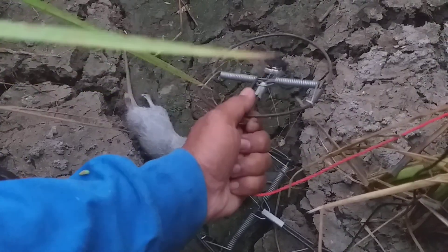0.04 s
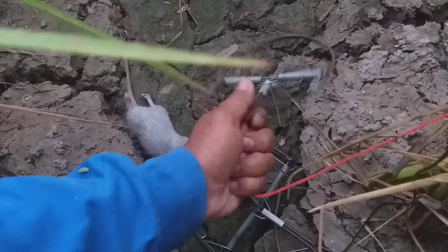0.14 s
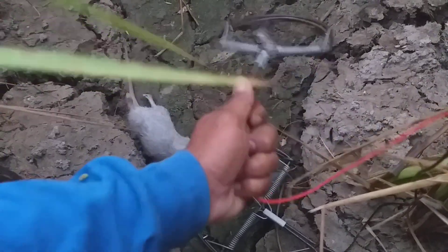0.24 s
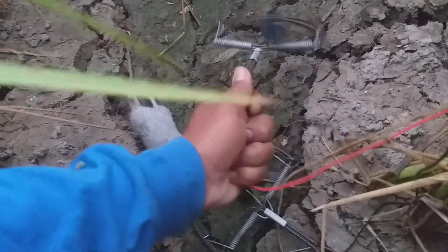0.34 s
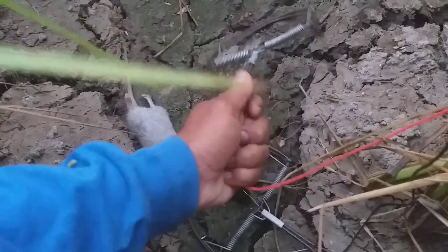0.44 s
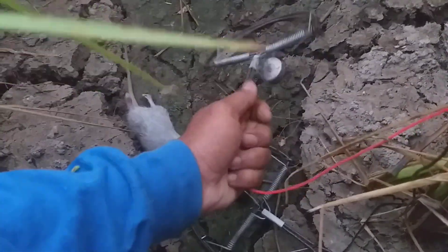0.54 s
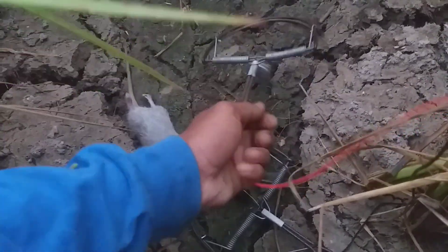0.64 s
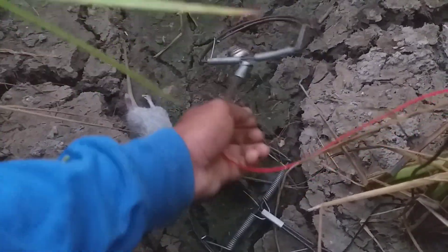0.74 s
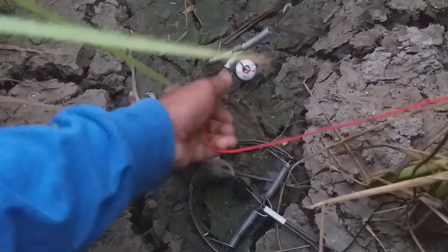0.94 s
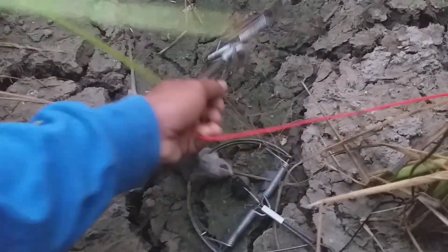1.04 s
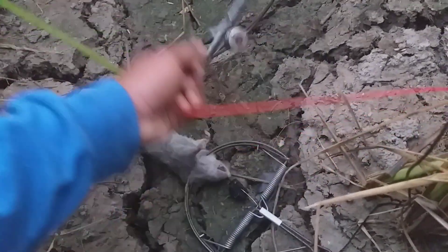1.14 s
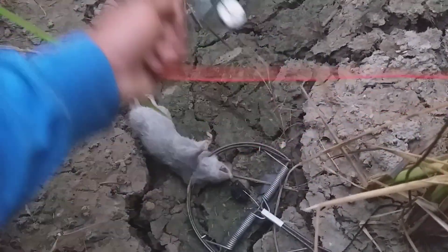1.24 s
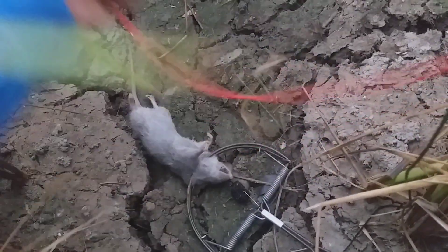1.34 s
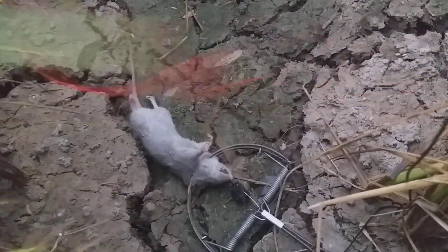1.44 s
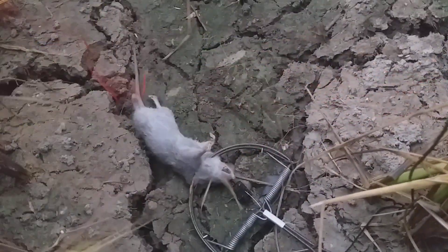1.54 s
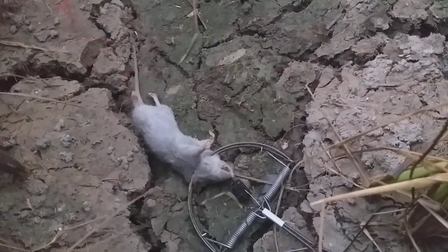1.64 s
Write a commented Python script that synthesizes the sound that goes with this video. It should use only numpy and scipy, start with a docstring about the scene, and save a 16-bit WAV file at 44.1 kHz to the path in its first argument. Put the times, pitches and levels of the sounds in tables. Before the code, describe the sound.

A steel spring trap snaps shut on dry mud, then ticks and dry grass rustles.

```python
"""A steel spring trap on dry mud, close to a small phone microphone, over far rumble and a faint bird.
A few light ticks, then at 0.2 s the springs let go: the bar snaps shut in a burst of blows, and the
frame rings and thuds into the mud. The springs shudder out; wire and plate tick as the trap settles.
From about 1 s it is pulled away through dry grass, and stalks crack. The microphone's bright peak near
7.6 kHz and its dip above that are part of the spectra of snap, ticks and grass."""
import sys
import numpy as np
from scipy import signal
from scipy.fft import rfft, irfft
from scipy.io import wavfile

SR = 44100
rng = np.random.default_rng(int(sys.argv[2]) if len(sys.argv) > 2 else 0)


def store_pcm(level_fs):
    """Save levels as 16-bit WAV."""
    pcm = np.round(np.clip(level_fs, -1, 1) * 32767).astype(np.int16)
    wavfile.write(sys.argv[1], SR, np.atleast_2d(pcm).T)


N = 72765


def snap():
    """The bar lands in hard blows, each a crack and a spray; the springs chatter, the frame hits mud."""
    # blows of the bar: t/s, relative level/dB
    blows = [(0.2139, -9.5), (.2150, -1.5), (.2160, -2), (0.2177, -5.5), (.2190, -11), (0.2203, -5),
             (0.2224, -10), (0.2259, -9.5), (0.2332, -19.5), (.2412, -18)]
    # slip, release and dying shudder of the springs: t/s, relative level/dB
    shudder = [(.170, -96), (.178, -61.5), (.2025, -53), (.205, -24.5), (.2135, -34), (.2160, -24.5),
               (.225, -27), (.234, -29), (.245, -33), (.268, -41.5), (.278, -42.5), (.31, -53.5),
               (.335, -51.5), (.37, -58), (.40, -58), (.43, -75)]
    # spectrum of the snap at the microphone: f/Hz, relative level/dB
    spectrum = [(88, -40), (150, -15), (466, -16.5), (566, -20.5), (905, -18.5), (1530, -29), (1870, -22),
                (3160, -10.5), (3420, -15.5), (4410, -7.5), (5570, -17.5), (7770, -4.5), (9820, -22.5),
                (14800, -9), (16000, -8)]
    shelf_hz = 1400   # spray and chatter are weaker below this
    spray = sum(fade(s, db - 9.5, t60=0.014) for s, db in blows) * grains(per_s=12000, spread_db=1.5)
    spray = split(spray, amp(-3) * spray, shelf_hz)
    cracks = sum(hit(s, db + 5) for s, db in blows)
    chatter = amp(curve(shudder, outside=-200) + 3.1 * drift(hz=190)) * grains(per_s=3500, spread_db=2.5)
    chatter = split(chatter, amp(-7) * chatter, shelf_hz)
    contacts = spray + cracks + chatter
    push = fade(blows[0][0], db=-18, t60=0.0091)   # the first blow drives the frame into the mud
    thud = ring(signal.lfilter([1, -1], [1], push), hz=112.7, t60=0.036)
    return colour(contacts, spectrum) + steel_frame(contacts) + thud


def steel_frame(contacts):
    """Every contact sets the frame's modes ringing."""
    # modes of the frame: f/Hz, relative level/dB, t60/s
    modes = [(3100, -13, .08), (3230, -48, .9), (4000, -20, .1), (4310, -16, .06), (7430, -17, .17),
             (7570, -16, .13), (7770, -6, .1), (7930, -4, .065), (8320, -12, .06), (11390, -27, .1),
             (13290, -19, .1), (14420, -17, .05), (14860, -8, .045), (15150, -18, .06)]
    return amp(-31) * sum(amp(db) * ring(contacts, hz, t60) for hz, db, t60 in modes)


def ticks():
    """Wire and plate knock before the snap and as the trap settles, ringing the frame's middle modes."""
    # small knocks: t/s, bright level/dB, t60/s, body f/Hz, body level/dB (levels relative)
    taps = [(.066, -52, 0.011, 5000, -83), (0.119, -51, 0.0082, 5060, -83), (.136, -66, 0.033, 3120, -63),
            (.190, -48, .02, 4540, -57), (0.2019, -29, 0.018, 3200, -24), (.206, -68, 0.015, 1100, -29.5),
            (.2455, -39, 0.0078, 4450, -27), (.249, -55, 0.017, 4250, -26.5),
            (.2595, -24, 0.015, 3900, -23), (0.2807, -29, 0.018, 5800, -33.5),
            (0.293, -51, 0.027, 3980, -58), (.316, -38, .025, 2200, -44), (.3175, -40, 0.017, 3260, -40.5),
            (.3185, -37.5, 0.02, 4450, -38), (0.344, -40, .05, 4120, -54), (.349, -38, 0.066, 4030, -50),
            (.364, -46, 0.042, 3320, -47), (.381, -42.5, 0.047, 3530, -64), (0.391, -37, 0.035, 885, -60.5),
            (0.395, -39.5, .04, 3040, -72), (.412, -49, 0.033, 3900, -55),
            (0.433, -52.5, 0.0051, 5030, -71), (.4415, -52, 0.013, 5500, -62),
            (0.4418, -39.5, 0.038, 5800, -73), (.473, -39.5, 0.023, 4400, -52),
            (.4848, -34.5, 0.029, 4500, -52), (.5245, -56, .04, 4550, -60), (.573, -43.5, 0.06, 4300, -53),
            (0.5866, -42.5, 0.018, 5300, -50), (.590, -33.5, 0.021, 2300, -62.5),
            (.678, -29, 0.0062, 4570, -49.5), (0.782, -75, 0.026, 3370, -69), (.785, -73, 0.029, 4500, -65)]
    # spectrum of their bright part at the microphone: f/Hz, relative level/dB
    spectrum = [(2940, -51), (5000, -16), (6050, -20.5), (6660, -7), (7530, 3.5), (8580, -8.5),
                (9370, -26.5), (11300, -21.5), (14300, -11), (16000, -24.5)]
    bright, body = knocks(taps)
    frame_drive = band(bright, [6000, 9000])
    return colour(bright, spectrum) + body + amp(-6.5) * steel_frame(frame_drive)


def grass():
    """Grass and a sleeve brush in dense dry grains, swelling as the trap is pulled off; stalks crack."""
    # brushing: t/s, treble level/dB, lower-band level/dB (levels relative)
    brush = [(0, -77, -82.5), (.15, -79, -98), (.3, -64.5, -51), (.42, -69.5, -73), (.55, -72.5, -74.5),
             (.7, -73.5, -77.5), (.735, -73.5, -84), (.75, -59, -91), (.77, -70.5, -91), (.83, -76.5, -89),
             (.94, -78, -82), (.975, -69.5, -80.5), (1.01, -74.5, -81), (1.06, -67.5, -69),
             (1.11, -70, -71), (1.17, -62, -64.5), (1.238, -54.5, -55.5), (1.25, -52.5, -55.5),
             (1.31, -49.5, -52.5), (1.37, -57.5, -55.5), (1.42, -55.5, -57), (1.48, -56, -58),
             (1.53, -55, -51), (1.58, -56.5, -53.5), (1.65, -60, -53)]
    # spectrum of dry grass at the microphone: f/Hz, relative level/dB
    spectrum = [(180, -58), (300, -24.5), (331, -20), (440, -30.5), (1360, -28.5), (1970, -10.5),
                (2320, -16), (3830, -6), (6000, -7), (7570, 1), (8360, 0), (9710, -19), (12100, -7),
                (15200, -8.5), (16000, -10.5)]
    # stalks that crack or scrape: t/s, bright level/dB, t60/s, body f/Hz, body level/dB (levels relative)
    stalks = [(1.058, -57.5, 0.053, 3570, -61), (1.129, -54, 0.036, 3860, -64.5),
              (1.246, -52, 0.05, 3600, -49), (1.265, -42, 0.054, 4800, -41.5),
              (1.293, -36, 0.05, 4700, -48), (1.303, -38, 0.021, 4130, -65), (1.314, -26, 0.026, 4000, -46),
              (1.347, -42, 0.063, 2160, -55.5), (1.356, -42, 0.05, 4550, -54),
              (1.519, -40.5, 0.068, 3850, -59), (1.571, -45, 0.025, 5180, -41.5),
              (1.635, -64, 0.11, 1600, -55.5)]
    flicker = amp(1.5 * drift(hz=61))
    rustle = colour(flicker * grains(per_s=9900, spread_db=3.0), spectrum)
    treble = rustle * amp(curve(brush) + 1)
    lower = rustle * amp(curve(brush, column=2) + 3)
    bright, body = knocks(stalks)
    return split(treble, lower, hz=5400) + colour(bright, spectrum) + body


def knocks(table):
    """Each knock is a hit and a short spray of contacts; returns the bright parts and the body notes."""
    spray = grains(per_s=7700, spread_db=1.0)
    bright = body = 0
    for s, db, t60, hz, body_db in table:
        bright += spray * fade(s, db - 8, t60) + hit(s, db - 2.5)
        push = spray * fade(s, body_db - 16.5, t60) + hit(s, body_db - 5.5)
        note = ring(push, hz, t60=1 / 150)
        body += band(note, [0.83 * hz, 1.4 * hz])   # steepens the skirts of the resonance
    return bright, body


def far_rumble():
    """Distant rumble and open air: bass-heavy noise whose level wanders."""
    # course of the rumble: t/s, level/dB
    levels = [(0.0, -68), (0.21, -63), (0.358, -72), (0.596, -74), (1.162, -75), (1.65, -66)]
    # spectrum of rumble and air: f/Hz, relative level/dB
    spectrum = [(15, -56), (25, -27.5), (48, -3), (111, -1.5), (153, -2.5), (192, -23.5), (231, -18),
                (528, -29), (835, -27.5), (915, -27.5), (1780, -29.5), (6000, -32.5), (7800, -61),
                (13200, -120)]
    return amp(curve(levels) + 1.3 * drift(hz=8)) * colour(rng.standard_normal(N), spectrum)


def far_bird():
    """A bird far off whistles two wavering glides with a strong third harmonic."""
    # one list per glide: t/s, f/Hz, level/dB
    calls = [
        [(0, 1318, -86), (.03, 1220, -80), (.08, 1082, -88), (.1, 990, -105)],
        [(.4, 1020, -100), (.44, 1039, -82.5), (.55, 1068, -92), (.62, 1227, -95), (.69, 1292, -88),
         (.74, 1227, -96), (.78, 1050, -103)],
    ]
    song = np.zeros(N)
    for call in calls:
        phase = 2 * np.pi * np.cumsum(curve(call)) / SR
        level = amp(curve(call, column=2, outside=-200) + 3.5 * drift(hz=21))
        song += level * (np.sin(phase) + amp(-3) * np.sin(3 * phase))
    return song


def amp(db):
    """Decibels to amplitude."""
    return 10 ** (np.asarray(db, float) / 20)


def rms_one(x):
    """Scale to rms 1."""
    return x / np.sqrt(np.mean(x ** 2) + 1e-20)


def curve(rows, column=1, outside=None):
    """Straight lines through one column of a table over time."""
    rows = np.array(rows)
    return np.interp(np.arange(N) / SR, rows[:, 0], rows[:, column], outside, outside)


def colour(x, spectrum):
    """Causal (minimum-phase) filter following a spectrum table; unit power gain."""
    size = 8192
    hz, db = np.transpose(spectrum)
    bin_hz = np.arange(size // 2 + 1) * SR / size
    log_gain = np.log(amp(np.interp(np.log(bin_hz + 1), np.log(hz), db)))
    cepstrum = irfft(log_gain)
    cepstrum[1:size // 2] *= 2
    cepstrum[size // 2 + 1:] = 0
    pulse = irfft(np.exp(rfft(cepstrum)))
    return signal.fftconvolve(x, pulse / np.sqrt(np.sum(pulse ** 2)))[:N]


def drift(hz):
    """Random wander, mostly slower than hz; rms about 1."""
    r = np.exp(-2 * np.pi * hz / SR)
    return rms_one(signal.lfilter([1], [1, -2 * r, r * r], rng.standard_normal(N + SR)))[SR:]


def grains(per_s, spread_db):
    """Random tiny contacts of uneven size; rms 1."""
    sizes = amp(spread_db * np.minimum(rng.exponential(1, N), 4)) * rng.choice([-1, 1], N)
    return rms_one(sizes * (rng.random(N) < per_s / SR))


def hit(s, db):
    """One single-sample contact."""
    return amp(db) * (np.arange(N) == int(s * SR))


def fade(s, db, t60):
    """Sudden start, exponential fall."""
    t = np.arange(N) / SR - s
    return amp(db - 60 * np.maximum(t, 0) / t60) * (t >= 0)


def ring(x, hz, t60):
    """One damped mode driven by x."""
    r, w = amp(-60 / (t60 * SR)), 2 * np.pi * hz / SR
    return signal.lfilter([0, np.sin(w)], [1, -2 * r * np.cos(w), r * r], x + 1e-18)


def band(x, hz, kind="band", order=2):
    """Band-, high- or low-pass filter with a flat passband."""
    return signal.sosfilt(signal.butter(order, hz, kind, fs=SR, output="sos"), x)


def split(upper, lower, hz):
    """Treble of one signal over the lower part of another."""
    return band(upper, hz, "high", order=4) + band(lower, hz, "low", order=4)


def scene():
    """All sources together: nearly mono, with slight stereo width in narrow bands near 1.8 and 9.9 kHz."""
    # narrow bands of stereo width: low f/Hz, high f/Hz, side level/dB
    width_bands = [(1400, 2200, -18), (9500, 10200, -22.5)]
    mid = snap() + ticks() + grass() + far_rumble() + far_bird()
    side = amp(-94.5) * rng.standard_normal(N)   # faint hiss
    for low_hz, high_hz, db in width_bands:
        side += amp(db) * band(mid, [low_hz, high_hz], order=3)
    return np.array([mid + side, mid - side])


def record(dry):
    """The deepest bass is lost and the top is cut steeply."""
    low_cut_hz, top_hz = 42, 16150
    thinned = band(dry, low_cut_hz, "high")
    return signal.sosfilt(signal.cheby2(24, 60, top_hz, fs=SR, output="sos"), thinned)


dry = scene()
out = record(dry)
store_pcm(out)
```